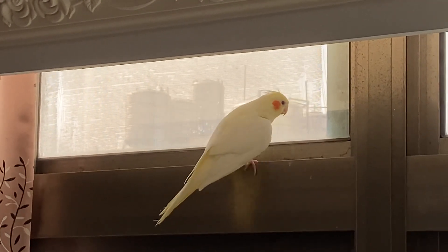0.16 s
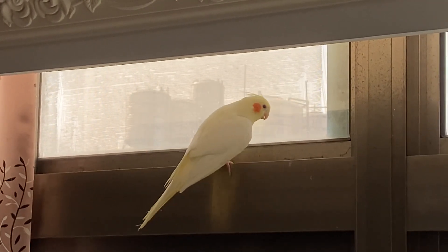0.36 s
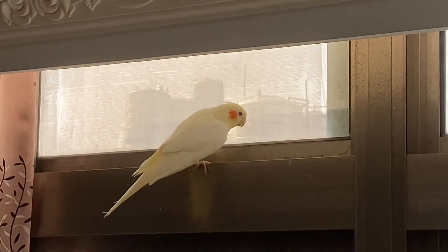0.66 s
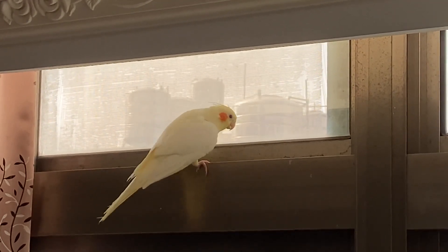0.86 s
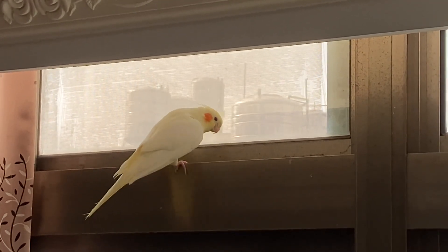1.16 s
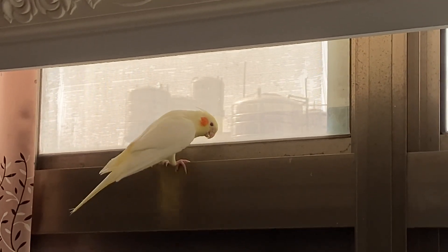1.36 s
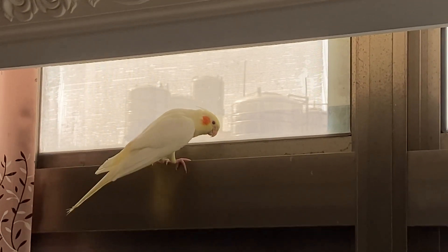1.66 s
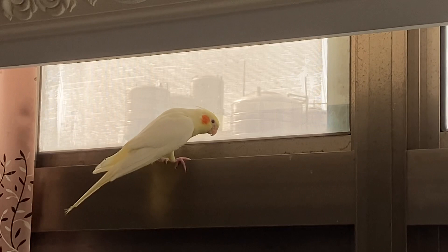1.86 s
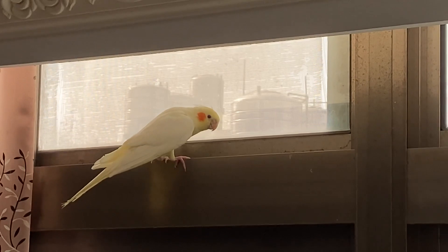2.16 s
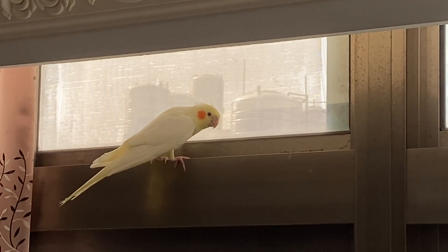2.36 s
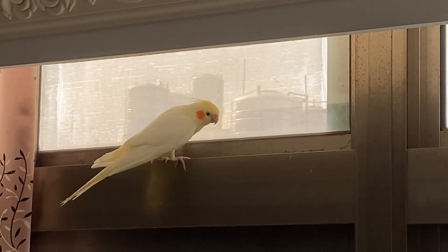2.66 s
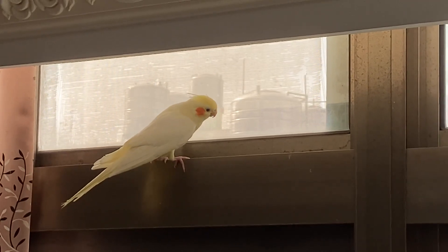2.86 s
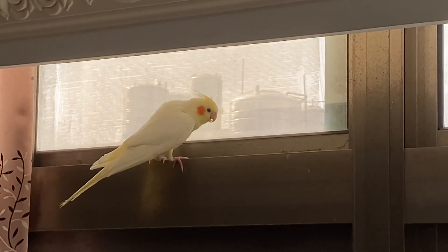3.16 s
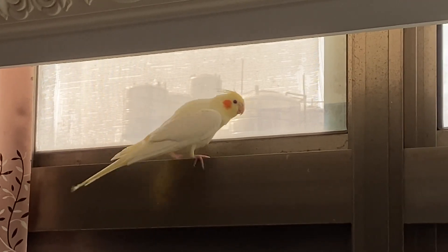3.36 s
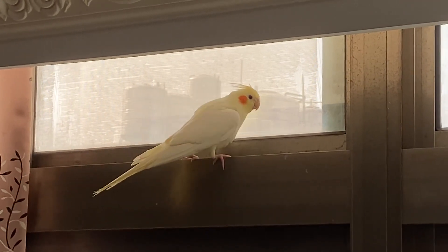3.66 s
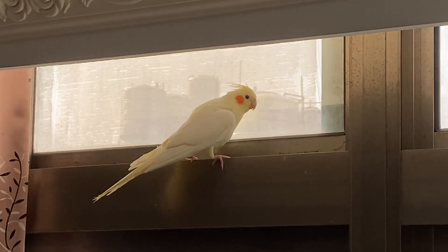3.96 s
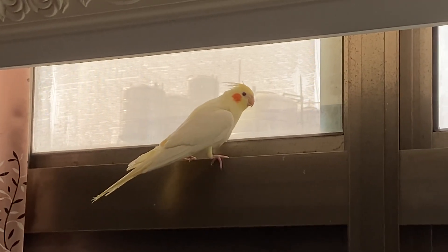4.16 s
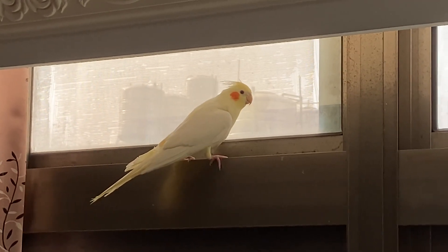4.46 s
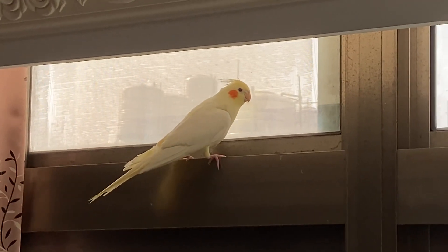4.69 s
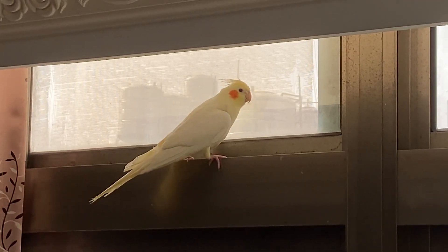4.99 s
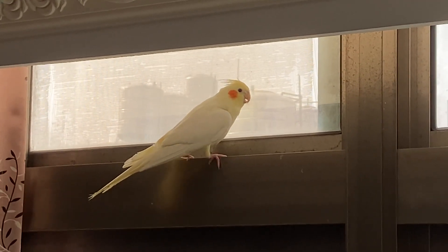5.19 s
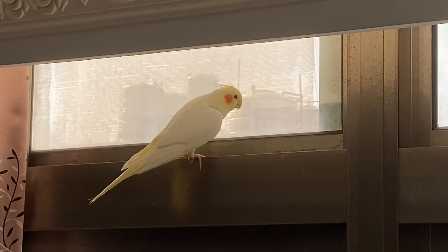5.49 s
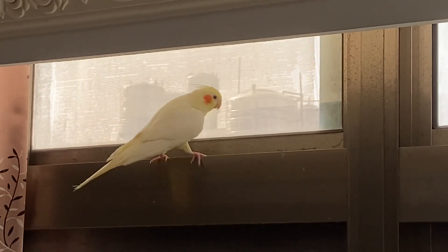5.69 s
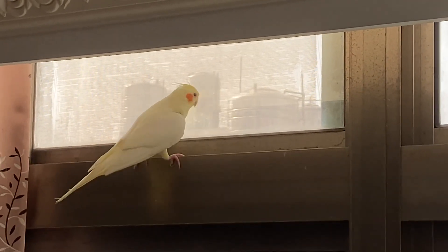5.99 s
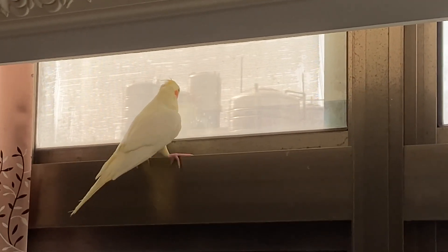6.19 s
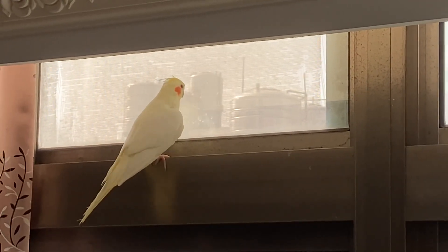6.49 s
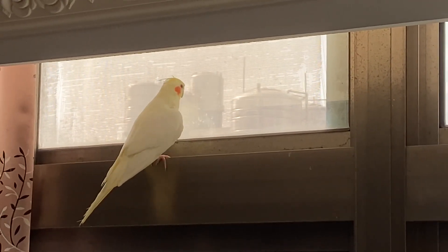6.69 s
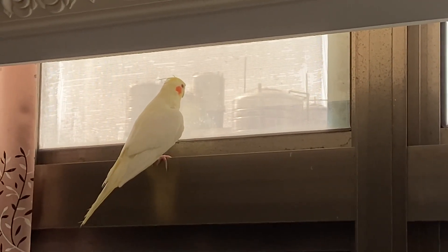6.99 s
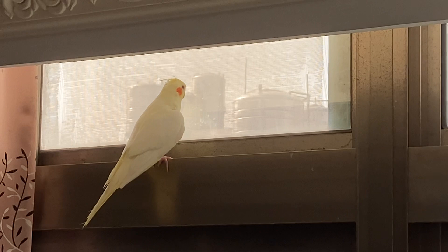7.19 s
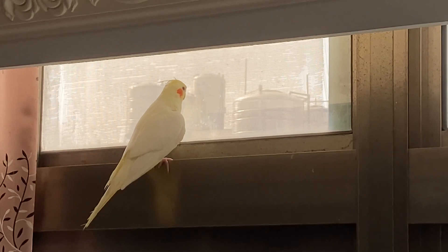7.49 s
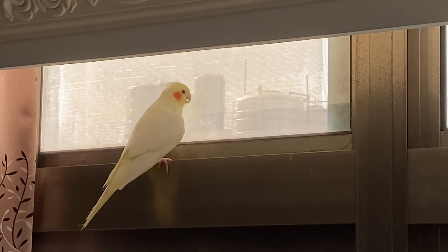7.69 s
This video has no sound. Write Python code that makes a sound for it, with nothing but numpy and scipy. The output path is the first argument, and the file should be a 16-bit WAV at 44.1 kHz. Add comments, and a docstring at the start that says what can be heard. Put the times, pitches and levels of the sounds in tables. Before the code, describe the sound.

Bright, sliding cockatiel whistles come in an opening flurry, then scattered short chirps, with one tiny claw tick and low distant road hum.

```python
"""A cockatiel on a window frame, a couple of metres from a phone, whistles and chirps in a bare room.
Its syrinx makes a gliding tone with overtones that the beak colours; a harsh voice trills and rasps.
A claw ticks once on the frame, as ringing modes and a scrape of noise. Faintly through the window come
birds as short whistles, engines and drones as low tones, and road rumble and tyres as filtered noise."""
import sys
import numpy as np
from scipy import signal
from scipy.fft import rfft, irfft
from scipy.io import wavfile
from scipy.ndimage import uniform_filter1d

SR = 44100
rng = np.random.default_rng(int(sys.argv[2]) if len(sys.argv) > 2 else 0)


def output_pcm(signal):
    """Save a mono or channel-first signal as 16-bit PCM at the path in sys.argv[1].

    Samples are clipped to [-1, 1] before scaling.
    """
    pcm = np.clip(np.atleast_2d(signal).T, -1, 1) * 32767
    wavfile.write(sys.argv[1], SR, np.round(pcm).astype(np.int16))


N = 345744

# Colour of the upper overtones: windpipe and beak with the microphone. Each row: frequency in Hz, gain in dB.
BEAK_COLOUR = [(2800, 9), (3600, 8.5), (5000, -6.5), (5600, -10), (6300, -5.5), (7200, -12), (8000, -9),
               (9500, -12.5), (12500, 9.5), (13700, -15.5), (15300, 4.5)]
ROOM_T60_S = 0.4964  # the room's reverberation below the treble
TOP_HZ = 15800  # upper limit of the phone


def undb(db):
    """Gain of a level in dB."""
    return 10 ** (np.asarray(db) / 20)


def unit(x):
    """Scaled to rms 1."""
    return x / np.sqrt(np.mean(x ** 2))


def band(x, hz, width_hz):
    """One resonance."""
    return signal.lfilter(*signal.iirpeak(hz, hz / width_hz, SR), x)


def walk(rate, size=N):
    """Random levels held 1 / rate s and slewed twice; spread near 1."""
    k = int(SR / rate)
    steps = np.repeat(rng.standard_normal(size // k + 1), k)
    return 1.4 * uniform_filter1d(uniform_filter1d(steps, k), k)[:size]


def read(table):
    """Where a table sounds, and its columns sample by sample."""
    s, *columns = np.transpose(table)
    where = np.arange(int(s[0] * SR), min(int(s[-1] * SR), N))
    return where, [np.interp(where / SR, s, c) for c in columns]


def colour(points, hz):
    """dB of a spectrum at hz, straight between its points on a log frequency scale."""
    points = np.array(points)
    return np.interp(np.log(hz), np.log(points[:, 0]), points[:, 1])


def tone(hz):
    """Running phase of a gliding pitch."""
    return 2 * np.pi * np.cumsum(hz) / SR


def road():
    """Road rumble: half-octave noise bands that each waver; the bass is alike at both ports, stronger at the right."""
    # Spectrum before the overall level is set. Each row: frequency in Hz, relative density in dB per Hz.
    rumble_colour = [(30, -9.5), (50, 2), (140, -4), (250, -9), (550, -27), (1300, -28.5), (2600, -37),
                     (4500, -55), (10000, -60.5)]
    level_db = -47.5
    f = np.fft.rfftfreq(N, 1 / SR) + 1
    noise = rfft(rng.standard_normal((2, N))) * undb(colour(rumble_colour, f))
    out = 0
    for hz in 22 * 2 ** np.arange(0, 10, .5):
        octaves_off = np.clip(np.log2(f / hz), -.5, .5)
        mid, side = irfft(noise * np.cos(np.pi * octaves_off) ** 2, N)
        wide = np.clip(0.083 + hz / 800, 0, 1)
        left_minus_right = wide * side - (1 - wide) * 0.29 * mid
        out = out + undb(1.8 * walk(0.91)) * (mid + left_minus_right * np.array([[1], [-1]]))
    return unit(out) * undb(level_db)


def tyres():
    """Tyre roar of a passing car: broad noise in the low middle, fading."""
    # Each row: time in seconds, level in dB.
    fading = [(0, -52.5), (1.198, -58), (3.301, -57.5), (4.801, -69.5), (7.84, -90)]
    s, db = np.transpose(fading)
    low_middle = signal.butter(3, [250, 1800], "band", fs=SR, output="sos")
    roar = signal.sosfilt(low_middle, rng.standard_normal((2, N)))
    return unit(roar) * undb(np.interp(np.arange(N) / SR, s, db))


def drones():
    """Heavy vehicles droning further off: plain tones that glide in pitch and level."""
    # One table a drone. Each row: time in seconds, pitch in Hz, level in dB before the left-right balance.
    passes = [
        [(0.6, 106, -53.5), (1.2, 103.5, -45.5), (1.7, 100.8, -54)],
        [(2.5, 93.25, -52), (3.15, 101.9, -48), (3.35, 104.5, -59.5)],
        [(6.6, 57.08, -60.5), (6.85, 61.95, -54), (7.55, 74.72, -42.5), (7.75, 71.15, -52)],
    ]
    out = np.zeros(N)
    for table in passes:
        where, (hz, db) = read(table)
        out[where] += np.sqrt(2) * undb(db) * np.sin(tone(hz)) * signal.windows.tukey(len(where), .1)
    return out


def engine():
    """Orders of the firing rate, each wavering on its own; the exhaust favours those near 200 Hz."""
    # An engine pulling away and changing gear. Each row: time in seconds, firing rate in Hz,
    # level in dB before the colour of the exhaust and the left-right balance.
    pulling_away = [(4.0, 33, -66), (4.7, 35, -59), (5.2, 39, -57), (5.36, 35, -58), (6.4, 38, -60)]
    out = np.zeros(N)
    where, (hz, db) = read(pulling_away)
    for k in range(3, 8):
        order_db = -8 * np.log2(k * hz / 200) ** 2
        waver_db = 2 * walk(3.21, size=len(where))
        out[where] += undb(db + order_db + waver_db) * np.sin(k * tone(hz))
    return out


def far_birds():
    """Birds outside: short whistles, most of them falling, each a wobbling tone with two overtones."""
    # Each row: start in seconds, length in seconds, first pitch in Hz, last pitch in Hz, peak of the tone in dB,
    # octave above the tone in dB, wobble of the pitch as a share.
    whistles = [(2.415, 0.0474, 3095, 2850, -74, -29, 0.0272),
                (3.502, 0.05, 2894, 1777, -58.5, -22.5, 0.01155),
                (3.69, 0.0567, 3750, 1848, -60.5, -16, .015), (4.663, 0.0291, 2092, 1850, -78, 2.5, 0.0676),
                (4.766, 0.016, 2110, 1850, -72, 3, 0.0587), (6.02, 0.083, 2292, 2310, -69.5, -26, 0.019),
                (6.719, 0.0513, 2098, 1629, -62.5, -24, .015), (7.038, 0.121, 1720, 1654, -70, -22, 0.0133)]
    glide_power = 3.3  # the pitch moves fast, then levels off
    out = np.zeros(N)
    for s, length, hz, end_hz, db, octave_db, wobble in whistles:
        n = int(length * SR)
        glide_hz = end_hz + (hz - end_hz) * np.linspace(1, 0, n) ** glide_power
        phase = tone(glide_hz * (1 + wobble * walk(400, size=n)))
        overtones = undb(octave_db) * (np.sin(2 * phase) + undb(-7.5) * np.sin(3 * phase))
        start = int(s * SR)
        out[start:start + n] += undb(db) * signal.windows.tukey(n) * (np.sin(phase) + overtones)
    return out


def earlier():
    """The end of an earlier phrase still ringing in the room: narrow noise dying at its tone and octave."""
    # Each row: pitch in Hz, level at the start in dB.
    ringing = [(1600, -40.5), (3200, -53.5)]
    decay = 1000. ** (-np.arange(N) / SR / ROOM_T60_S)
    out = 0
    for hz, db in ringing:
        narrow = band(band(rng.standard_normal((2, N)), hz, hz / 8), hz, hz / 8)
        out = out + undb(db) * unit(narrow) * decay
    return out


def room(x):
    """Sparse strong echoes from glass and frame, then a dense tail whose treble dies sooner."""
    treble_t60_s, nearby_t60_s, nearby_db = .3, 0.05, 17
    t = np.arange(SR) / SR
    noise = rng.standard_normal((3, SR))
    tail = noise[0] + 0.58 * noise[1:]  # partly shared by left and right
    low = signal.sosfilt(signal.butter(2, 7000, fs=SR, output="sos"), tail)
    treble = undb(-3.0) * (tail - low)
    tail = low * 1000. ** (-t / ROOM_T60_S) + treble * 1000. ** (-t / treble_t60_s)
    tail *= np.clip(t / 0.00903 - .4, 0, 1)  # the first walls answer after a few ms
    sparse = np.sqrt(25) * (rng.random(SR) < 1 / 25) * np.sign(noise[0]) * (t > .002)
    tail += undb(nearby_db) * sparse * 1000. ** (-t / nearby_t60_s)
    tail /= np.sqrt(np.sum(tail ** 2, axis=1)[:, None])
    return signal.fftconvolve(x[None], tail, axes=1)[:, :N]


def claws():
    """A claw on the window frame: the struck modes ring along with a short scrape of noise."""
    # Each row: time in seconds, level in dB.
    ticks = [(5.871, -24)]
    # Modes of the frame. Each row: frequency in Hz, level relative to the tick in dB, t60 in seconds.
    frame_modes = [(380, -23, 0.005), (552, -11.5, 0.00654), (895.3, -17.5, 0.0037), (1220, -29, 0.0076),
                   (2525, 0, 0.0041), (10560, 2, 0.0025)]
    out, t = np.zeros(N), np.arange(SR // 10) / SR
    ring = sum(undb(db) * np.sin(2 * np.pi * hz * t) * 1000. ** (-t / t60) for hz, db, t60 in frame_modes)
    for s, db in ticks:
        scrape = undb(-9.0) * uniform_filter1d(rng.standard_normal(len(t)), size=3) * np.exp(-t / 0.0055)
        start = int(s * SR)
        out[start:start + len(t)] += undb(db) * (ring + scrape)
    return out


def phrase(syllables, climb_bend, drop_bend, release_db, sag_hz_per_s):
    """Each syllable climbs, holds and drops, then slides to the next; the windpipe favours tones near its resonance.

    Returns where it sounds, pitch, tone level, octave level, and how far it is held or dropped.
    """
    # Each row: frequency in Hz, gain of the tone in dB.
    windpipe = [(1400, -22.5), (1900, -12), (2350, -6), (2700, -6.5), (2900, -2.5)]
    swell = 1.439  # power: most of the effort arrives early in the climb
    (onset, climb, hold, drop, first_hz, top_hz, last_hz,
     db, fade_db, soft_db, octave_db, thin_db) = np.transpose(syllables)
    turns = np.cumsum([onset, climb, hold, drop], axis=0)  # start of the climb, hold, drop and slide
    where = np.arange(int(onset[0] * SR), min(int(turns[-1, -1] * SR), N))
    t = where / SR
    k = np.clip(np.searchsorted(onset, t) - 1, 0, None)  # the syllable now sung

    def along(start, length):
        """Progress through a stage, 0 to 1."""
        return np.clip((t - start[k]) / np.maximum(length[k], 1 / SR), 0, 1)

    up, holding, down = along(onset, climb), along(turns[1], hold), along(turns[2], drop)
    slide = along(turns[3], np.append(np.diff(onset), 1) - climb - hold - drop)

    hz = top_hz[k] - (top_hz - first_hz)[k] * (1 - up) ** climb_bend
    hz -= (top_hz - last_hz)[k] * down ** drop_bend
    hz -= sag_hz_per_s * hold[k] * holding * (1 - down)
    hz += slide * (np.roll(first_hz, -1) - last_hz)[k]

    # each drop leads to the level of the next onset, the last one to the release
    end_db = np.append((db - soft_db)[1:], (db - fade_db)[-1] - release_db)
    effort_db = db[k] - soft_db[k] * (1 - up) ** swell - fade_db[k] * holding
    effort_db += down * (end_db - db + fade_db)[k]

    top_hz = np.interp(t, turns[1:3].T.ravel(), np.repeat(top_hz, 2))
    octave_points = np.transpose([octave_db, octave_db - thin_db]).ravel()
    octave_db = np.interp(t, turns[[1, 3]].T.ravel(), octave_points)
    lost_db = colour(windpipe, top_hz) - colour(windpipe, hz)  # the tone loses it, its octave does not
    octave_db = octave_db + lost_db + colour(BEAK_COLOUR, 2 * hz) - colour(BEAK_COLOUR, 2 * top_hz)
    return where, hz, effort_db - lost_db, octave_db, (up == 1) * (1 - down), down * (1 - slide)


def bird():
    """The syrinx: a tone, its octave, and upper overtones coloured by the beak; as heard and as sent into the room."""
    # One table a phrase, one row a syllable. Each row: onset, climb, hold and drop in seconds,
    # first, top and last pitch in Hz, level in dB, fade over the hold in dB, softness of the onset in dB,
    # octave overtone above the tone in dB, thinning of the octave from top to end in dB.
    song = [
        [(0.16, 0.0633, 0.0422, 0.0245, 2181, 2579, 1782, -17, 11.5, 20, -20.5, 10.5),
         (0.322, 0.0289, 0.0321, 0.0432, 1950, 2540, 1381, -22.5, -2, 5.5, -32, -8)],
        [(0.72, 0.024, 0.00267, 0.073, 1510, 1681, 1442, -38.5, 0.5, 0, 6, 34.5),
         (0.838, 0.0249, 0.0031, 0.0059, 1468, 1827, 1830, -37.5, -8, -3, -10.5, 3),
         (0.876, 0.0343, 0.00404, 0.0033, 1802, 2036, 2046, -36, -2, -8.5, -18.5, 2.5)],
        [(1.057, 0.0351, 0.06095, 0.0268, 2175, 2767, 1391, -16.5, 11, 16, -24.5, 7.5)],
        [(1.305, 0.03705, 0.00176, 0.0776, 2300, 2818, 1863, -17, -1, 18, -19, 25.5)],
        [(1.538, 0.0528, 0.0124, 0.055, 1963, 2675, 1690, -19, 1.5, 23, -21.5, 23.5),
         (1.668, 0.0879, 0.023, 0.025, 1640, 2546, 1280, -19, 6.5, 27, -24.5, 16)],
        [(3.054, 0.0908, 0.0222, 0.033, 1606, 2821, 2499, -21, 0.5, 14, -21.5, 8.5)],
        [(5.166, 0.0968, 0.023, 0.0324, 1599, 2819, 1982, -17.5, 4, 13.5, -25.5, 0.5),
         (5.325, 0.0378, 0.00967, 0.0107, 1977, 2694, 2508, -25, 6.5, 2, -20, -4)],
        [(6.173, .045, 0.015, .005, 1555, 2063, 2145, -29.5, 17, 12, -4.5, 4),
         (6.236, 0.02365, 0.0464, 0.02904, 2211, 2837, 2052, -23, -2.5, 13.5, -19.5, 4.5),
         (6.36, 0.01543, 0.0325, 0.0079, 2216, 2941, 2006, -16, 4, 9, -22, -3)],
        [(7.62, 0.02235, 0.01244, 0.0085, 1687, 1820, 2026, -37.5, -6, 15.5, 9.5, 11),
         (7.664, .016, 0.044, 0.026, 2040, 2737, 1987, -17, 5, 18.5, -30.5, -8),
         (7.765, 0.0358, 0.01182, 0.019, 2014, 2764, 1797, -19, 3.5, 11, -30, -6)],
    ]
    # Each row, one a phrase: high overtones above the tone in dB, harshness 0-1,
    # left minus right in dB, direct sound as the head turns in dB.
    delivery = [(-33.5, 0.07, 4, -3.5), (-26, 0, 0.5, -3), (-38.5, 0.08, 0, -1), (-29, 0.12, 0.5, -3),
                (-27, 0.05, -3, -3.5), (-33.5, 0.55, -4.5, -3.5), (-40, 0.46, 5.5, -5),
                (-43, 0.47, 7, -6.5), (-38.5, 0.3, 1.5, -4)]
    # Each row, one a phrase: power by which the climb slows near the top, power by which the drop gathers speed
    # (both 1 = straight), effort lost over the last drop in dB, sag of a held pitch in Hz per second.
    bends = [(2.1, 2.7, 7.5, 1197.5), (1.5, 1.1, 11.5, 304.5), (2.2, 0.65, 8, -500), (1.4, 3.3, 13, 302.5),
             (2.4, 0.84, 9, 1501.5), (1, 1.497, 30.5, 1500), (1.4, 1.1, 11, 293), (1, 0.5984, 31, 295.5),
             (1.2, 0.756, 18.5, 284.5)]
    # One value a phrase: share of its harshness that goes while a pitch is held (0-1).
    steadied_shares = [0.23, 0.2607, 0.3074, 0.046, .3, 0.063, 0.16, 0.11, 0.86]
    drop_harsh = 0.3  # harshness gained as the pitch drops away
    trill_hz, trill_depth = 78.578, 1.09  # mean rate; depth of the throb for a fully harsh voice
    rasp_per_step = 0.54  # noise on each overtone, per step up the series
    # a fully harsh voice starts rich in low overtones and loses them along the phrase
    rich_db, dulling_db_per_s = 15.5, 111

    heard, sent = np.zeros((2, N)), np.zeros(N)
    for syllables, bend, steadied, manner in zip(song, bends, steadied_shares, delivery):
        treble_db, harsh, pan_db, facing_db = manner
        where, hz, db, octave_db, held, down = phrase(syllables, *bend)
        n = len(where)
        harsh = harsh * (1 - np.clip(steadied, 0, 1) * held) + drop_harsh * down
        harsh = uniform_filter1d(harsh, size=300)
        # a harsh voice trills: each beat swells while its pitch climbs
        beat = tone(trill_hz * (1 + 0.0947 * walk(37.73, size=n))) + 2 * np.pi * rng.random()
        hz = uniform_filter1d(hz, size=400, mode="nearest")  # the syrinx muscles round each turn
        hz *= 1 + harsh * (0.0643 * np.cos(beat) + 0.015 * walk(500, size=n))
        phase = tone(hz)
        richness_db = harsh * (rich_db - dulling_db_per_s * np.arange(n) / SR)
        overtones = 0
        for k in range(2, 11):
            high = np.clip(k * hz / 3000 - 2.6, 0, 1)  # low overtones follow the octave, high ones the tone
            shade = (1 - high) * (octave_db - colour(BEAK_COLOUR, 2 * hz)) + high * treble_db
            shade += colour(BEAK_COLOUR, k * hz) + richness_db * (k > 2) * (1 - high)
            # uneven closures break up the overtones, the high ones most
            rasp = 1 + rasp_per_step * k * harsh * walk(1400, size=n)
            below_limit = np.clip((SR / 2 - k * hz) / TOP_HZ * 4, 0, 1)  # no overtone passes half the sample rate
            overtones += rasp * undb(shade) * below_limit * np.sin(k * phase)
        throb = 1 - np.clip(trill_depth * harsh, 0, 1) * np.sin(beat)
        voice = (np.sin(phase) + overtones) * throb
        voice *= signal.windows.tukey(n, .06) * np.sqrt(2) * undb(db)
        heard[:, where] += voice * undb([[facing_db + pan_db / 2], [facing_db - pan_db / 2]])
        sent[where] += voice
    return heard, sent


def scene():
    """The bird and claw near and in the room, the street through the window."""
    room_db, port_lag_s = 1.5, 5.5e-5
    (near, sent), ticks, far = bird(), claws(), far_birds()
    echoes = undb(room_db) * room(sent + ticks + undb(6.5) * far)
    near += ticks + echoes + earlier()
    # the right port is further off
    lag = np.exp(-2j * np.pi * np.fft.rfftfreq(N, 1 / SR) * port_lag_s)
    near[1] = irfft(rfft(near[1]) * lag, N)
    bass = (engine() + drones()) * undb([[-2.5], [2.5]])  # stronger at the right
    return near + far + bass + road() + tyres()


def record(dry):
    """The microphone drops the deepest bass and the phone cuts the top."""
    dry = signal.sosfilt(signal.butter(3, 36, "high", fs=SR, output="sos"), dry)
    return signal.sosfilt(signal.ellip(12, .2, 100, TOP_HZ, fs=SR, output="sos"), dry)


dry = scene()
out = record(dry)
output_pcm(out)
```